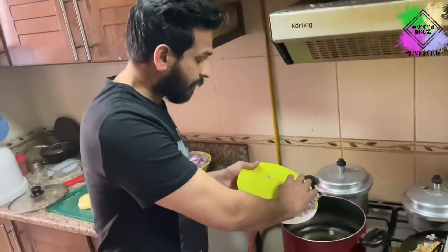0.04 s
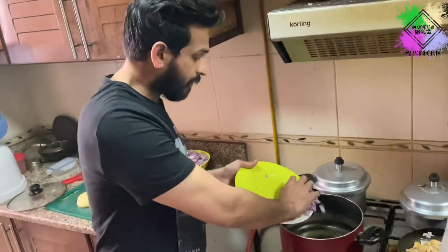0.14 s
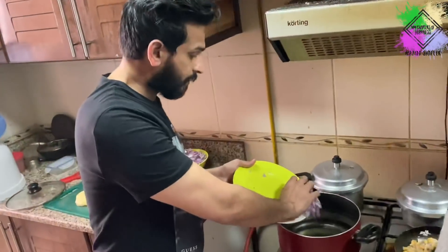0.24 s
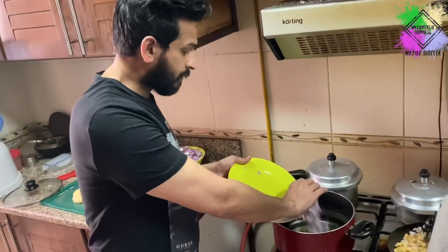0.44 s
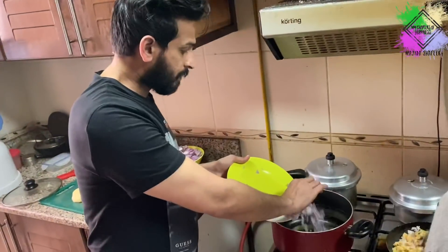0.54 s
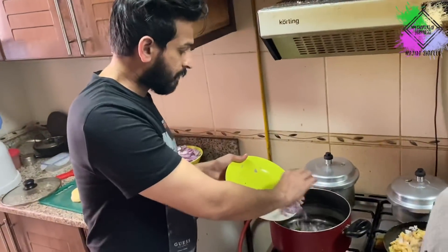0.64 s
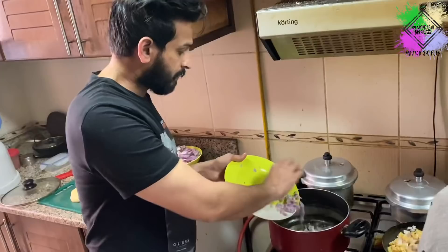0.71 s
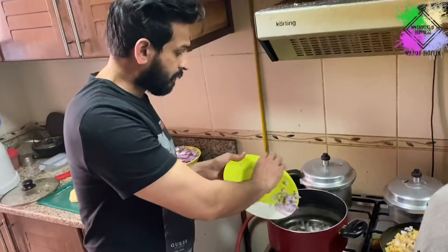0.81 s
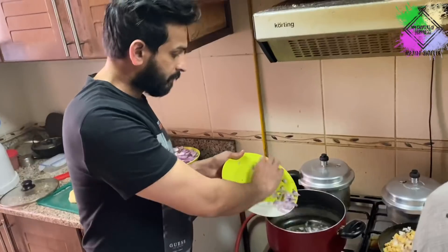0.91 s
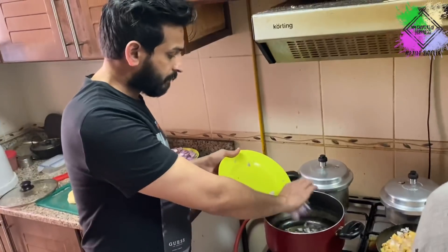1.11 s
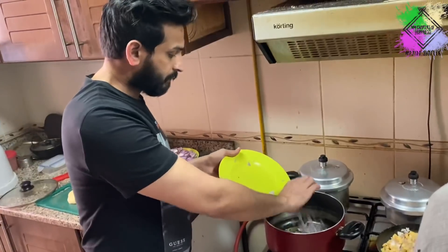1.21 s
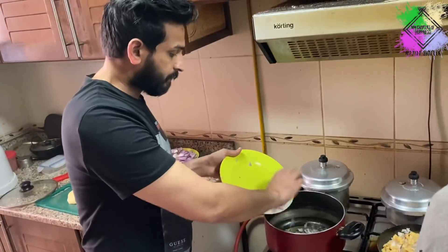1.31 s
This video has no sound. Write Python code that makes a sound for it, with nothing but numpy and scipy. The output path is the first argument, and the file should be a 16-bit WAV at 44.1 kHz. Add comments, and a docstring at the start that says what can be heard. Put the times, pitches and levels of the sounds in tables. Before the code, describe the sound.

Sliced onions slide off a plate into a metal pot of hot oil, a quick cluster of hollow knocks and wet patter, then bright steady sizzling; close stereo microphone in a small tiled kitchen, hood fan behind.

```python
"""In a tiled kitchen, sliced onion slides off a plate into a metal pot of hot oil.
Pieces knock the pot: decaying sines boom in its hollow and ring its walls, and loose slices patter as noise bursts.
The oil answers with a fizz of bursting bubbles that swells and settles, and with puffs from single drops.
Behind it a hood fan blows coloured noise and hums; sparse decaying taps give the kitchen's echo."""
import sys
import numpy as np
from scipy import signal
from scipy.fft import rfft, irfft, next_fast_len
from scipy.io import wavfile

SR = 44100
rng = np.random.default_rng(int(sys.argv[2]) if len(sys.argv) > 2 else 0)


def inscribe(sig):
    """Save sig as 16-bit PCM at rate SR to the path in sys.argv[1].

    A 1-D sig is mono; a 2-D sig holds one channel per row.
    Samples are clipped to [-1, 1] before scaling.
    """
    pcm = np.round(np.clip(np.atleast_2d(sig).T, -1, 1) * 32767)
    wavfile.write(sys.argv[1], SR, pcm.astype(np.int16))


N = 59535  # length in samples

# Pieces landing. Each row: start in seconds, relative boom level in dB, boom pitch in Hz, relative ring level in dB,
# hardness in dB per octave, favoured wall pitch in Hz, contact in seconds.
PIECES = [(0.1, -22.5, 455.6, -27.5, -6.5, 860, 0.016), (.2355, -10.5, 456.6, -19, 0.5, 1210, 0.02),
          (.311, -15.5, 477, -21.5, -6, 1055, 0.013), (.339, -19, 498, -26, -6, 830, 0.0028),
          (.384, -7, 456.7, -14, -7, 663, 0.013), (.4037, -7.5, 456.4, -35.5, -6, 2697, 0.0305),
          (.434, -17, 512, -29, -6.5, 1630, .014), (.458, -8.5, 505.4, -17, -8.5, 1048, 0.01),
          (.473, -21, 470, -33, -5, 1630, 0.01), (.488, -12.5, 491, -22.5, -5.5, 1049, 0.0177),
          (.503, -22, 470.5, -30.5, -6, 1630, 0.02), (.523, -9.5, 455, -20, -7, 742, 0.0103),
          (.539, -20, 471, -17, -7, 664, 0.015), (0.544, -33, 477, -42, -9, 2697, 0.0076),
          (.553, -9.5, 471.5, -20, -9.5, 1048, 0.0059), (0.581, -14.5, 439.5, -19.5, -7.5, 590, 0.013),
          (.598, -21.5, 430, -36, -25, 636, 0.01), (.615, -20.5, 520, -36, -27, 610, 0.0035),
          (.654, -39, 442, -40, -6.5, 815, 0.0051), (.683, -29.5, 440, -46, -24, 850, 0.017),
          (.697, -28, 470, -46, -3.5, 817, 0.027), (.731, -35.5, 486, -33.5, -9, 1048, 0.014),
          (.771, -27, 436, -36, -9, 663, 0.015), (.835, -27, 454, -47, -3, 591, 0.013),
          (.862, -31.5, 418, -55, -12, 817, 0.015), (1.238, -24.5, 462, -34, -6, 590, 0.01),
          (1.272, -30, 482, -53, 4, 695, 0.0072)]
# Walls of the pot. Each entry: pitch of one mode in Hz.
WALL_HZ = [591, 663, 742, 817, 860, 1048, 1425, 1630, 2180, 2228, 2468, 2697, 3265, 4285, 4570, 4680, 5500]
# The same modes in order. Each row: level in dB before hardness tilts it, t60 in seconds before a soft piece damps it.
WALL_MODES = [(-5, 0.32), (-4.5, 0.34), (-7, 0.084), (-6, 0.52), (-3.5, 0.2), (2, 0.11), (1, 0.15),
              (6, 0.18), (-4, 0.22), (-7, 0.26), (-8.5, 0.24), (3.5, 0.21), (-9, 0.34), (-11.5, 0.26),
              (-15, 0.33), (-11, 0.2), (-10, 0.17)]
# Air in the hollow, as the patter stirs it. Each row: pitch in Hz, width in Hz, relative level in dB.
HOLLOW = [(417.3, 8.4, 0), (447, 34, 2), (490, 17, 8)]
# Loose slices pattering in. Each row: time in seconds, relative level in dB.
PATTER_LEVEL = [(.09, -56), (.12, -46), (.22, -68), (.245, -47), (.30, -43), (.37, -33), (.40, -33),
                (.47, -33), (.52, -27.5), (.58, -34.5), (.66, -47), (.78, -45), (.82, -48), (.95, -54.5),
                (1.2, -51), (1.26, -49), (1.35, -57)]
# Tone of the patter. Each row: frequency in Hz, relative level in dB.
SCRAPE_COLOUR = [(350, -15), (500, -20), (700, 5), (1000, 4.5), (1250, -2.5), (1600, -1.5), (2100, -4),
                 (2600, -18), (3500, -19.5), (6000, -29)]
# Drops bursting. Each row: start in seconds, level in dB, pitch in Hz, width to each side in octaves,
# rise in seconds, t60 in seconds.
SPITS = [(.776, -28.5, 5200, .6, .001, .015), (.819, -35, 2700, .4, .002, .04),
         (1.063, -37, 4150, .15, .003, .04), (1.0795, -29, 4600, .3, .0004, .012),
         (1.117, -42, 1700, .7, .012, .15)]
# The pot between the ears. Each row: frequency in Hz, left over right in dB.
POT_BALANCE = [(330, 5.5), (500, -3.5), (900, -0.5), (1800, -0.5), (2740, 7), (6400, 5.5)]
# Phase of the pot between the ears. Each row: frequency in Hz, lead of the left in radians.
POT_LEAD = [(300, -0.4), (860, -1.18), (1890, -1.32), (2150, 0.13), (7000, 0.83)]
# Swell of the fizz. Each row: time in seconds, relative body level in dB, relative top level in dB.
FIZZ_LEVEL = [(0, -48, -43.5), (.2, -46, -41), (.25, -42.5, -38.5), (.37, -47, -42), (.5, -43, -39),
              (.62, -38.5, -37.5), (.7, -39, -37.5), (.8, -38, -35), (.9, -39, -37.5), (1.05, -39, -38),
              (1.2, -40.5, -38), (1.35, -40, -36.5)]
# Tone of the fizz. Each row: frequency in Hz, relative level in dB.
FIZZ_COLOUR = [(700, -5.5), (1500, -4), (2500, -4.5), (4000, -1), (5500, 0), (7000, 2), (9000, 4.5),
               (12000, 1), (15500, -4)]
# The fizz between the ears. Each row: frequency in Hz, left over right in dB.
FIZZ_BALANCE = [(1200, 1), (3500, 2), (5000, 3.5), (7200, -0.5)]
# How alike the ears hear the fizz. Each row: frequency in Hz, likeness from 0 to 1.
FIZZ_LIKENESS = [(1700, 0.24), (2700, 0.8), (4000, 0.74), (5800, 0.37), (7000, 0.46)]
# Tone of the fan's air. Each row: frequency in Hz, relative level in dB.
FAN_COLOUR = [(15, -24), (25, 3.5), (81, 2.5), (200, -3.5), (324, 1), (450, 1.5), (567, 2.5), (743, -15.5),
              (866, -4.5), (1050, -45), (1160, -14), (1540, -17), (2500, -13), (3250, -29), (5500, -120)]
# How alike the ears hear the fan's air. Each row: frequency in Hz, likeness from 0 to 1.
FAN_LIKENESS = [(60, 0.99), (130, 0.92), (290, 0.73), (450, 0.042), (1700, 0.13)]
# Hum of the fan. Each row: pitch in Hz, lowest level of its waver, roughly, in dB.
HUM = [(49, -56.5), (100, -51.5), (724, -53.5)]
# Echo of the kitchen. Each row: frequency in Hz, t60 in seconds.
KITCHEN_T60 = [(300, 0.28), (1000, 0.42), (3000, 0.32), (8000, 0.31)]
# Half-turns of left against right in the treble. Each row: start of the turn in Hz, end of the turn in Hz.
TURNS = [(7150, 8350), (9560, 10400), (11600, 12500), (13700, 14600)]

BOOM_DB, BOOM_RISE_S, BOOM_T60_S = -5.0, 0.0073, 0.037
BOOM_TAIL_DB, BOOM_TAIL_T60_S = -13, 0.1
FAVOUR_DB, FAVOUR_OCTAVES = 9.5, 0.04
FAVOUR_FREE = 0.42  # share of the damping that the favoured mode escapes
SCATTER_DB, DAMPING_PER_DB = 2.5, 0.23
CHOKE_DB_PER_S2, WOBBLE_DB, WOBBLE_HZ = 1200, 2.5, 29.6  # wet slices choke the ring and make it waver
RING_RISE_S, SOFTER_RISE_PER_DB = 0.0034, 0.16  # rise at zero hardness; softer pieces rise slower
CRACK_DB, CRACK_T60_S, CRACK_TOP_HZ = 5.5, 0.14, 4080  # crack level at zero hardness
PATTER_PER_S, PATTER_SPREAD_DB, PATTER_T60_S = 250, 3.22, 0.023
PATTER_DB, PATTER_BOOM_DB, PATTER_RING_DB, SCRAPE_DB = -2.5, 0.5, -7.5, 13.5
BUBBLES_PER_S, BUBBLE_SPREAD_DB, POP_T60_S = 4400, 2, 0.002
FIZZ_DB, SPLIT_HZ, HISS = 6.5, 11050, 1.16  # HISS is a gain against the bubbles
FAN_DB, KITCHEN_DB, KITCHEN_TOP_HZ = -41, -3.5, 5830
POT_LOW_HZ, MIC_LOW_HZ, EDGE_HZ = 360, 38.2, 15850
TURN_BLUR = 0.45  # loss of likeness halfway through a turn


def pieces():
    """Each piece swells a boom in the hollow, held for its contact time, and rings the walls."""
    out = np.zeros(N)
    t = np.arange(0, .35, 1 / SR)
    swell = np.sin(np.pi / 2 * np.minimum(t / BOOM_RISE_S, 1)) ** 2
    tail = gain_of(BOOM_TAIL_DB - 60 * t / BOOM_TAIL_T60_S)
    for start, boom_db, hz, ring_db, hardness_db, favoured_hz, contact in PIECES:
        after_contact = np.maximum(t - contact, 0)
        fall = gain_of(-60 * after_contact / BOOM_T60_S) + tail
        boom = swell * fall * gain_of(boom_db + BOOM_DB) * np.sin(2 * np.pi * hz * t)
        ring = gain_of(ring_db) * walls(t, hardness_db, favoured_hz)
        add(out, start, boom + ring)
    return out


def walls(t, hardness_db, favoured_hz):
    """Wall modes ring with a short noise crack; hardness lifts the high modes, softness damps all of them."""
    hz = np.array(WALL_HZ)[:, None]
    level_db, t60 = np.transpose(WALL_MODES)[:, :, None]
    favour = np.exp(-(np.log2(hz / favoured_hz) / FAVOUR_OCTAVES) ** 2)
    scatter, phase, pace, wobble_phase = rng.random((4, len(WALL_HZ), 1))

    tilt_db = hardness_db * np.log2(hz / 1000) * (1 - favour)
    level_db = level_db + tilt_db + FAVOUR_DB * favour + SCATTER_DB * (scatter - .5)
    softness_db = np.minimum(hardness_db, 0)
    damped_t60 = t60 * np.exp(DAMPING_PER_DB * softness_db * (1 - FAVOUR_FREE * favour))
    fall_db = -60 * t / damped_t60 - CHOKE_DB_PER_S2 * t ** 2
    # each mode wavers at its own pace, from half to one and a half times WOBBLE_HZ
    wobble_db = WOBBLE_DB * np.sin(2 * np.pi * (WOBBLE_HZ * (.5 + pace) * t + wobble_phase))
    modes = gain_of(level_db + fall_db + wobble_db) * np.sin(2 * np.pi * (hz * t + phase))
    ring = modes.sum(0)

    dull_noise = signal.lfilter(*signal.butter(1, CRACK_TOP_HZ, fs=SR), rng.standard_normal(len(t)))
    crack = gain_of(CRACK_DB + 2 * hardness_db - 60 * t / CRACK_T60_S) * dull_noise
    rise_s = RING_RISE_S * np.exp(-SOFTER_RISE_PER_DB * hardness_db)
    return np.minimum(t / rise_s, 1) * (ring + crack) / 2


def patter():
    """Many small slices slide and land at random: a rough rattle that also stirs the hollow and the walls."""
    t = np.arange(0, .3, 1 / SR)
    level = gain_of(along(PATTER_LEVEL) + PATTER_DB)
    rattle = level * bursts(PATTER_PER_S, PATTER_SPREAD_DB, PATTER_T60_S)
    scrape = gain_of(SCRAPE_DB) * coloured(rattle, SCRAPE_COLOUR)
    hollow = sum(gain_of(db) * np.exp(-np.pi * width * t) * np.sin(2 * np.pi * hz * t)
                 for hz, width, db in HOLLOW)
    ring = walls(t, hardness_db=-10.5, favoured_hz=1048)
    body = gain_of(PATTER_BOOM_DB) * evened(hollow) + gain_of(PATTER_RING_DB) * evened(ring)
    # the rattle excites the body as an impulse response
    return scrape + signal.oaconvolve(rattle, body / np.sqrt(len(t)))[:N]


def spits():
    """Single drops of juice burst in the oil: noise puffs, each with its own colour and length."""
    out = np.zeros(N)
    t = np.arange(0, .06, 1 / SR)
    for start, db, hz, octaves, rise, t60 in SPITS:
        edges_hz = hz * 2 ** np.array([-octaves, octaves])
        band = signal.butter(2, edges_hz, "bandpass", fs=SR)
        puff = evened(signal.lfilter(*band, rng.standard_normal(len(t))))
        add(out, start, np.minimum(t / rise, 1) * gain_of(db - 60 * t / t60) * puff)
    return out


def fizz():
    """Steam bubbles burst by the thousand over an even hiss; body and top swell apart, split by pitch."""
    lowpass = signal.firwin(63, SPLIT_HZ, fs=SR)[None]
    body = signal.oaconvolve(bubbles(), lowpass, "same")
    second = bubbles()
    top = second - signal.oaconvolve(second, lowpass, "same")
    body_gain, top_gain = gain_of(along(FIZZ_LEVEL)), gain_of(along(FIZZ_LEVEL, column=2))
    return gain_of(FIZZ_DB) * (body * body_gain + top * top_gain)


def bubbles():
    """Each bubble is a tiny burst of noise; two independent streams with hiss spread over the ears."""
    streams = []
    for _ in range(2):
        pops = bursts(BUBBLES_PER_S, BUBBLE_SPREAD_DB, POP_T60_S)
        hissing = pops + HISS * rng.standard_normal(N)
        streams.append(evened(coloured(hissing, FIZZ_COLOUR)))
    return spread(*streams, FIZZ_LIKENESS, FIZZ_BALANCE)


def fan():
    """The hood blows steady coloured noise, wide between the ears, with a wavering hum of sines in the middle."""
    colour = FAN_COLOUR + [(6000, -56)]  # a faint air stays above the dip
    a, b = (gain_of(FAN_DB) * evened(coloured(noise, colour)) for noise in rng.standard_normal((2, N)))
    t = np.arange(N) / SR
    hum = 0
    for hz, db in HUM:
        waver_db = 2 + 2 * np.sin(9 * t + hz)  # the pitch doubles as a start phase
        hum = hum + gain_of(db + waver_db) * np.sin(2 * np.pi * hz * t)
    return spread(a, b, FAN_LIKENESS, [(1, -0.35)]) + hum


def kitchen(x):
    """Tiles echo as sparse taps of random sign, each band dying at its own speed."""
    taps = np.zeros((2, SR))
    slots = np.arange(300, SR - 20, 20)
    at = slots + rng.integers(0, 20, (2, len(slots)))  # one tap somewhere in every slot
    np.put_along_axis(taps, at, rng.choice([-1., 1.], at.shape), 1)
    hz, t, bands = signal.stft(taps, SR, nperseg=256)
    decay = gain_of(-60 * t / read(KITCHEN_T60, hz)[:, None])
    tail = signal.istft(bands * decay, SR, nperseg=256)[1]
    return signal.fftconvolve(x[None], tail / np.linalg.norm(tail[0]), axes=1)[:, :N]


def bursts(per_s, spread_db, t60):
    """Noise comes in short random bursts of uneven size, each fading over t60."""
    struck = rng.random(N) < per_s / SR
    size = gain_of(spread_db * np.minimum(rng.exponential(1, N), 5)) * struck
    power = signal.lfilter([1], [1, -gain_of(-120 / (t60 * SR))], size ** 2)
    return evened(np.sqrt(power) * rng.standard_normal(N))


def spread(a, b, likeness, balance, lead=((1, 0),)):
    """Left hears a; right hears a blend of a and b, with its own level and phase, turning in the treble."""
    size = next_fast_len(N + 4096)
    hz = np.fft.rfftfreq(size, 1 / SR)
    a, b = rfft(a, size), rfft(b, size)
    turned = np.pi * sum(np.clip((hz - lo) / (hi - lo), 0, 1) for lo, hi in TURNS)
    treble = hz > TURNS[0][1]  # past the first turn, likeness and balance no longer follow the tables
    blurred = 1 - TURN_BLUR * np.sin(turned) ** 2
    share = np.where(treble, blurred, np.clip(read(likeness, hz), -1, 1))
    half = np.where(treble, 1, gain_of(read(balance, hz) / 2))
    blend = share * a + np.sqrt(1 - share ** 2) * b
    right = blend * np.exp(1j * (turned - read(lead, hz))) / half
    return irfft(np.array([a * half, right]), size)[:, :N]


def coloured(x, points):
    """Shape the spectrum by a curve of levels in dB."""
    return irfft(rfft(x) * gain_of(read(points, np.fft.rfftfreq(N, 1 / SR))), N)


def read(points, hz):
    """Read a table between its rows on a log frequency scale."""
    f, value = np.transpose(points)
    return np.interp(np.log(hz + 1), np.log(f + 1), value)


def along(rows, column=1):
    """Draw a straight-line envelope through rows that start with a time."""
    rows = np.array(rows)
    return np.interp(np.arange(N) / SR, rows[:, 0], rows[:, column])


def gain_of(db):
    """Turn dB into an amplitude factor."""
    return 10 ** (np.asarray(db) / 20)


def evened(x):
    """Scale to an RMS level of one."""
    return x / np.sqrt(np.mean(x ** 2) + 1e-20)


def add(mix, start, sound):
    """Lay a sound into the mix at its start in seconds, cut at the end of the mix."""
    part = mix[round(start * SR):][:len(sound)]
    part += sound[:len(part)]


def scene():
    """Pot and spits sound directly and through the kitchen; fizz and fan join without echo."""
    highpass = signal.butter(4, POT_LOW_HZ, "highpass", fs=SR, output="sos")
    pot = signal.sosfilt(highpass, pieces() + patter() + spits())
    dull = signal.sosfilt(signal.butter(4, KITCHEN_TOP_HZ, fs=SR, output="sos"), pot)
    direct = spread(pot, pot, [(1, 0.97)], POT_BALANCE, POT_LEAD)
    return direct + gain_of(KITCHEN_DB) * kitchen(dull) + fizz() + fan()


def record(dry):
    """The small microphone loses the lowest bass; then the recorder's band limit ends the treble."""
    thin = signal.sosfilt(signal.butter(2, MIC_LOW_HZ, "highpass", fs=SR, output="sos"), dry)
    lowpass = signal.firwin(511, EDGE_HZ, window=("kaiser", 9), fs=SR)[None]
    return signal.oaconvolve(thin, lowpass, "same")


dry = scene()
out = record(dry)
inscribe(out)
```